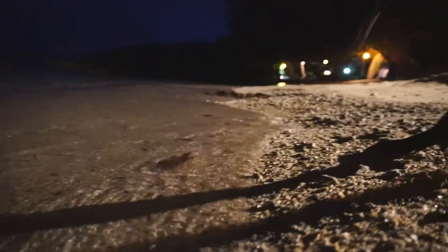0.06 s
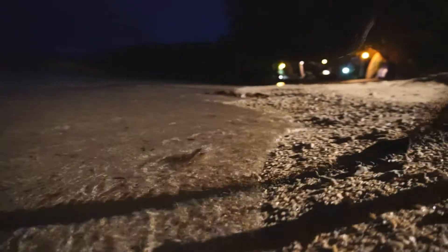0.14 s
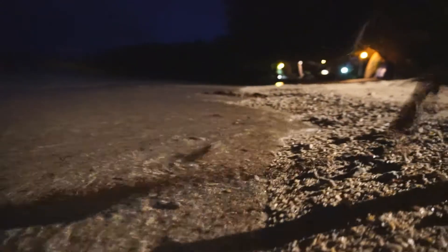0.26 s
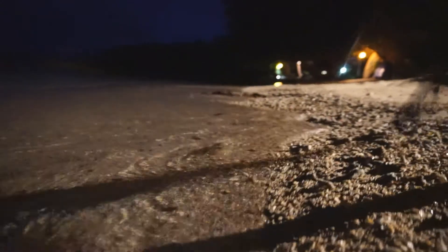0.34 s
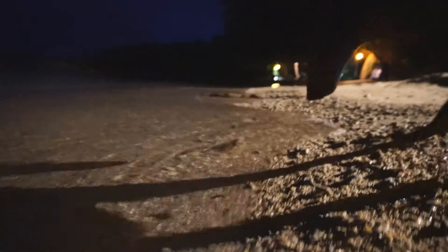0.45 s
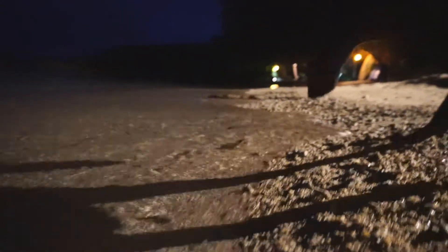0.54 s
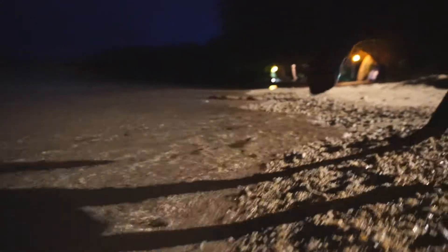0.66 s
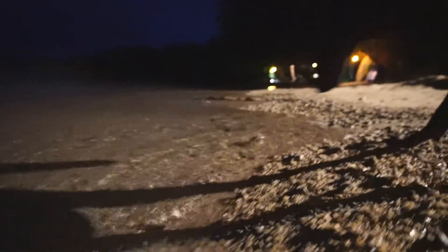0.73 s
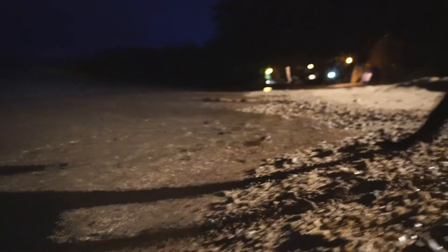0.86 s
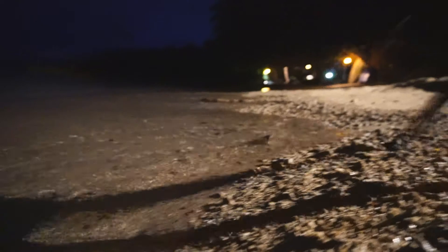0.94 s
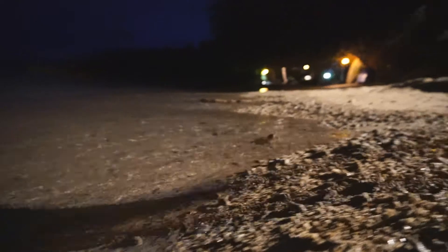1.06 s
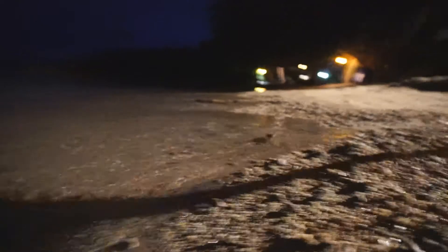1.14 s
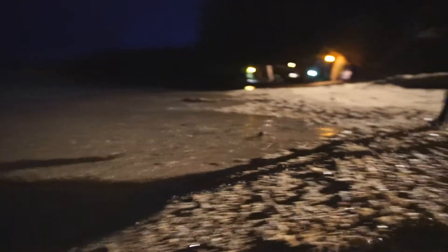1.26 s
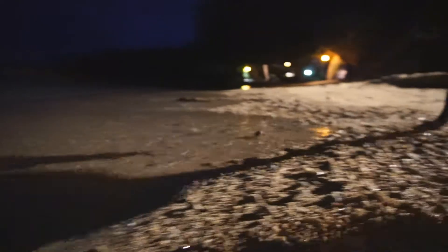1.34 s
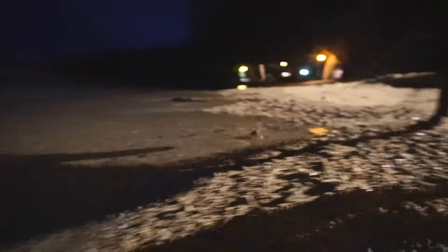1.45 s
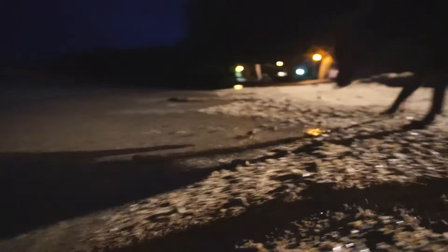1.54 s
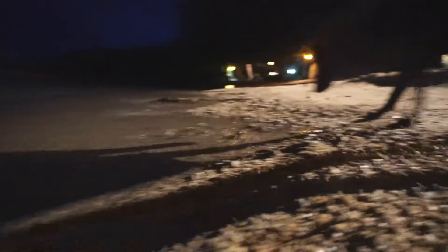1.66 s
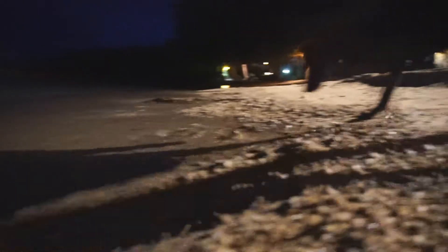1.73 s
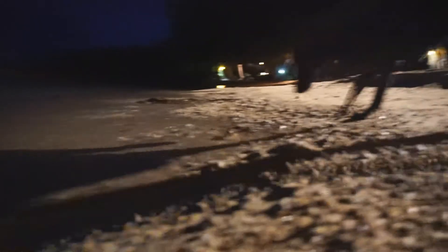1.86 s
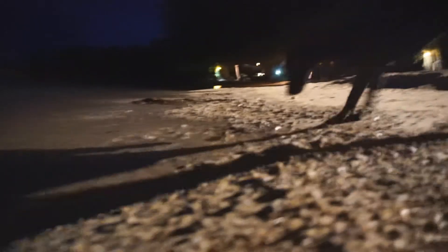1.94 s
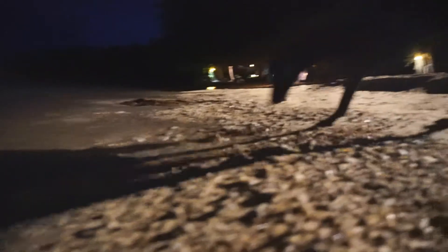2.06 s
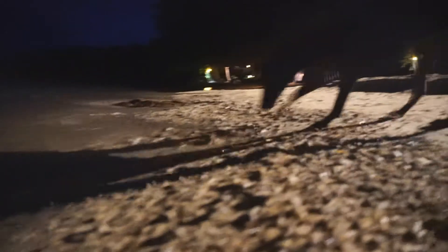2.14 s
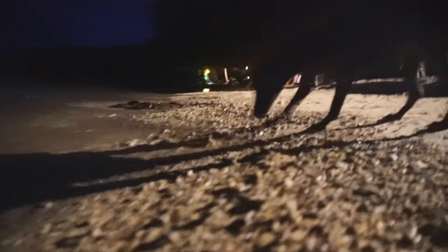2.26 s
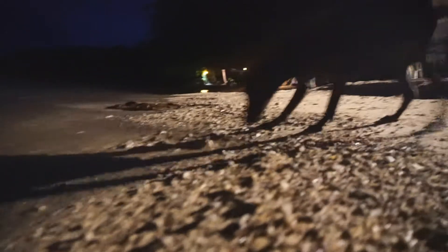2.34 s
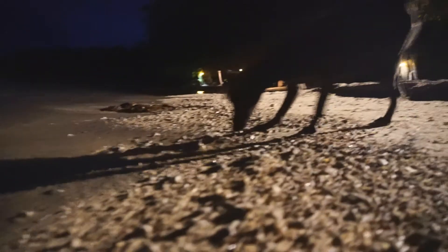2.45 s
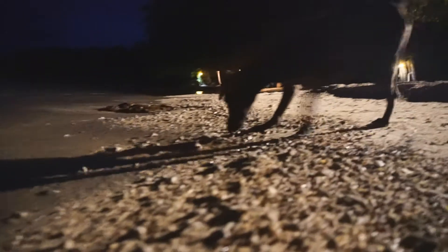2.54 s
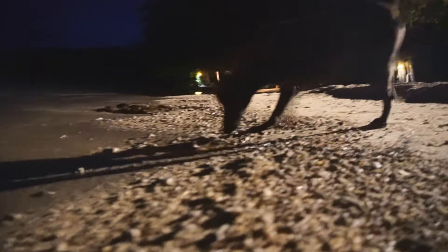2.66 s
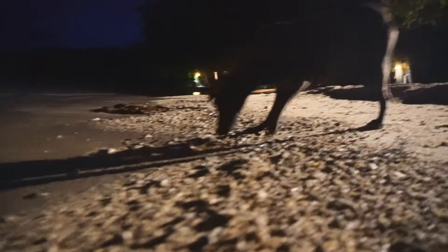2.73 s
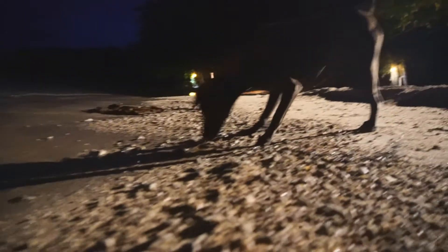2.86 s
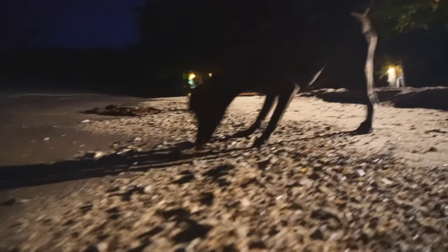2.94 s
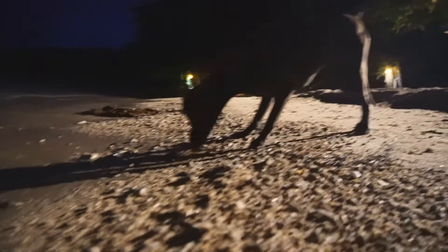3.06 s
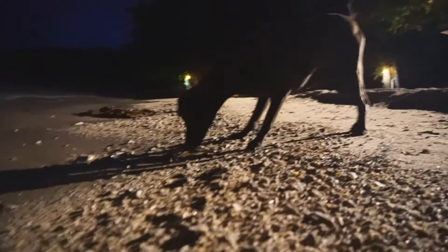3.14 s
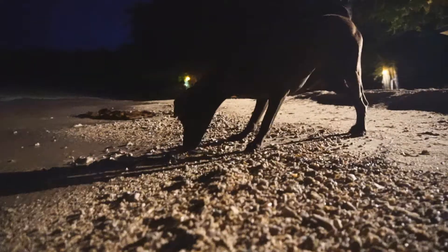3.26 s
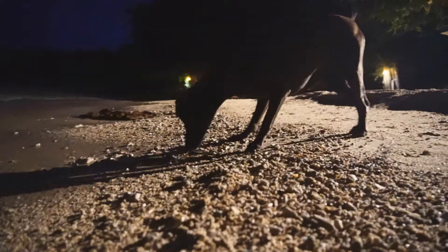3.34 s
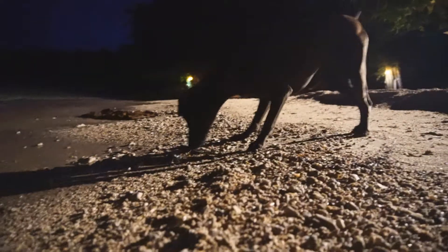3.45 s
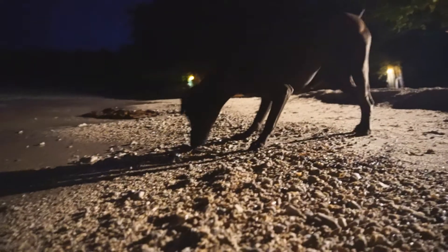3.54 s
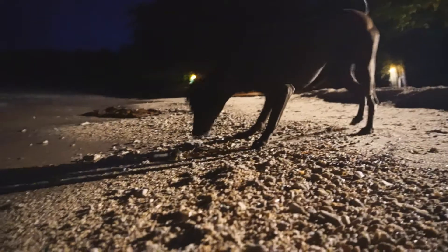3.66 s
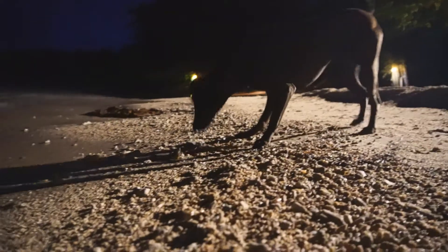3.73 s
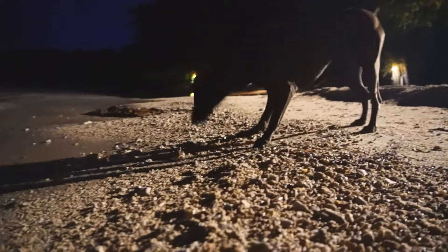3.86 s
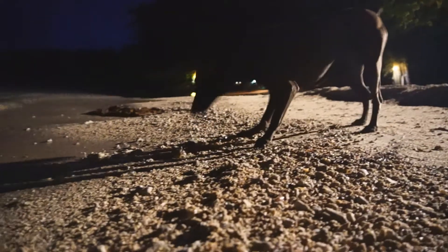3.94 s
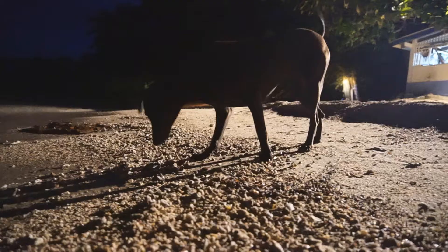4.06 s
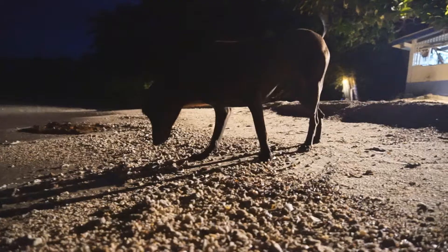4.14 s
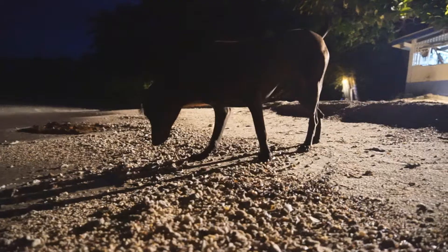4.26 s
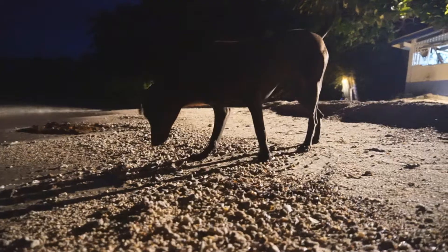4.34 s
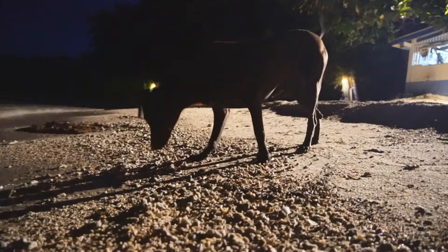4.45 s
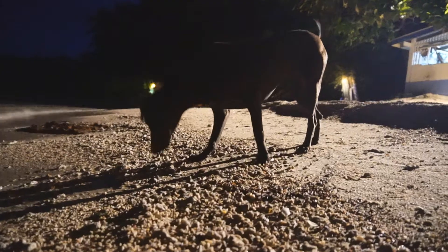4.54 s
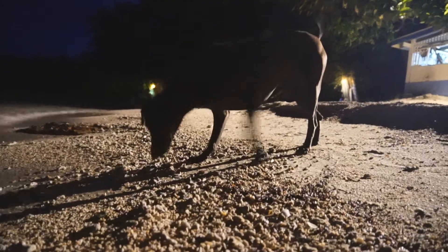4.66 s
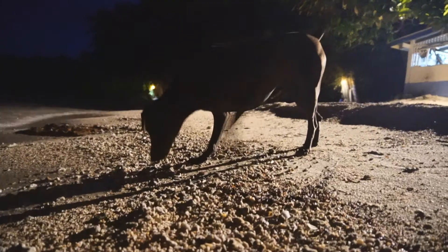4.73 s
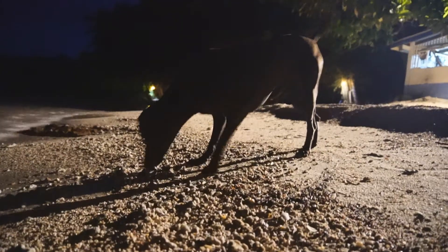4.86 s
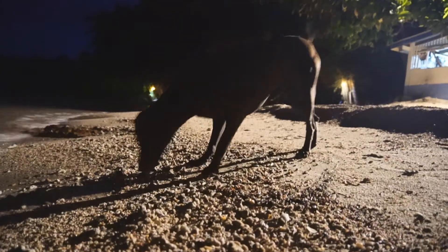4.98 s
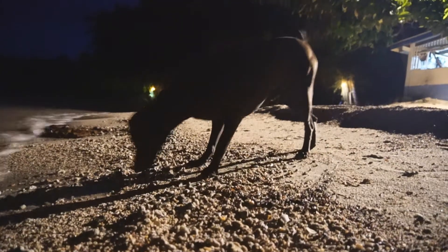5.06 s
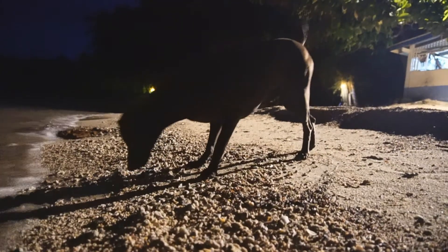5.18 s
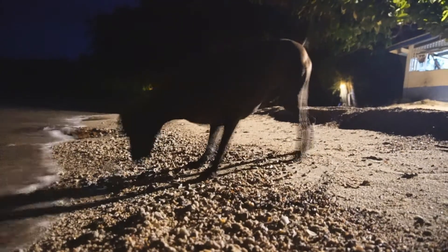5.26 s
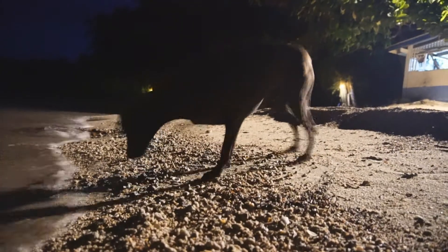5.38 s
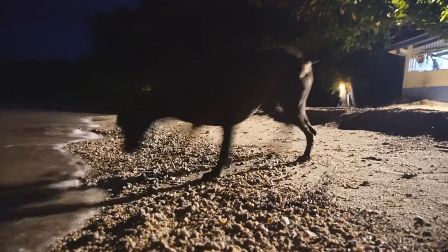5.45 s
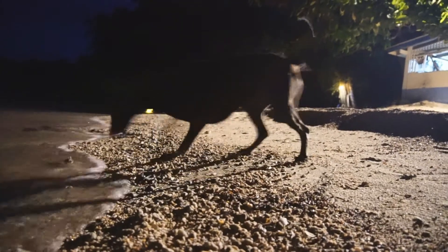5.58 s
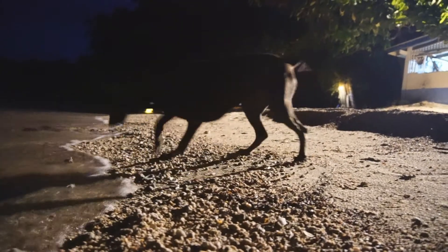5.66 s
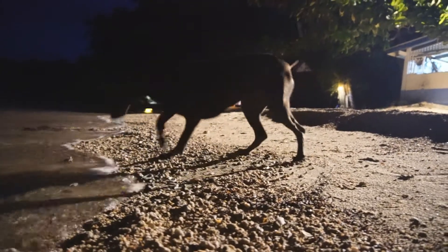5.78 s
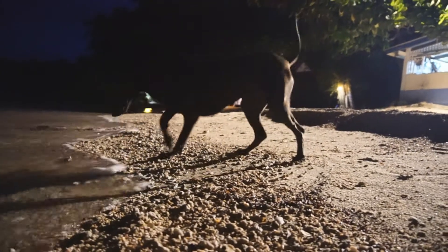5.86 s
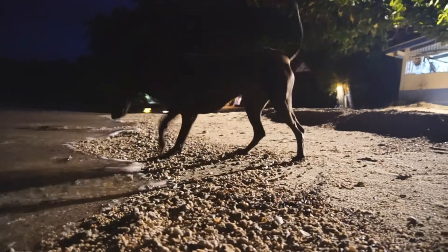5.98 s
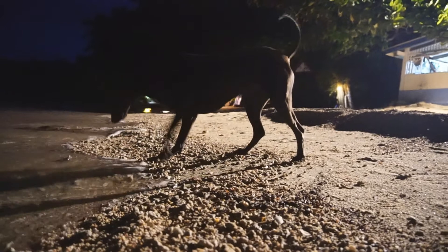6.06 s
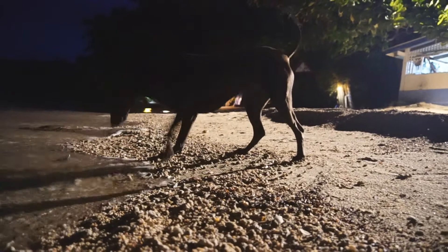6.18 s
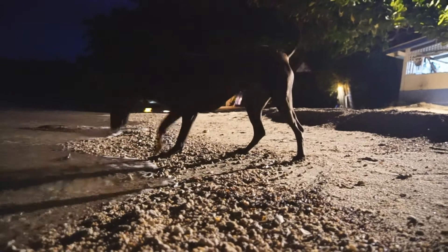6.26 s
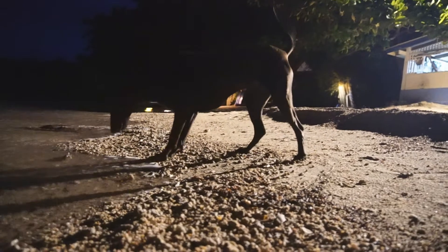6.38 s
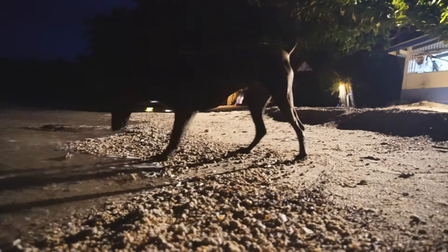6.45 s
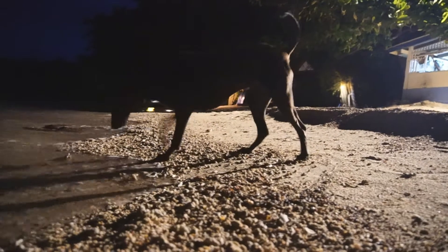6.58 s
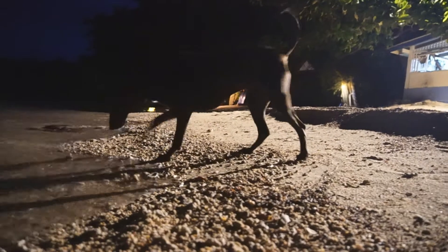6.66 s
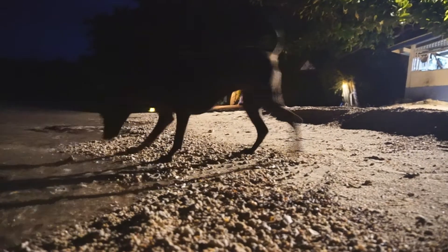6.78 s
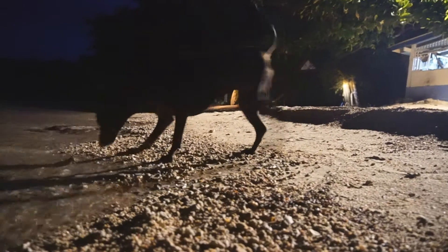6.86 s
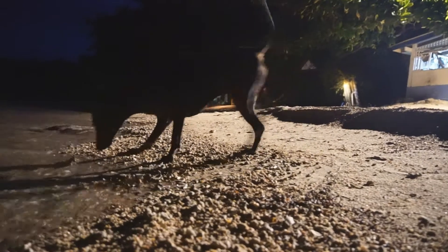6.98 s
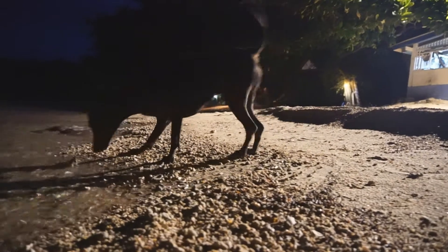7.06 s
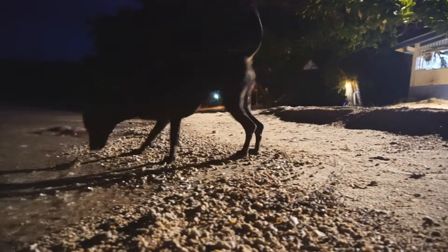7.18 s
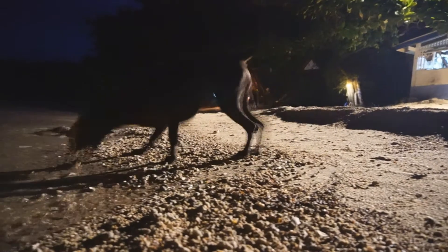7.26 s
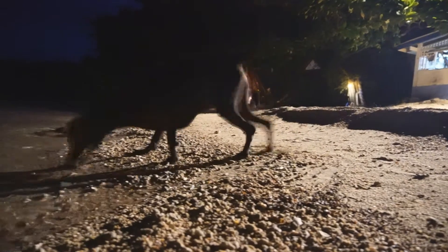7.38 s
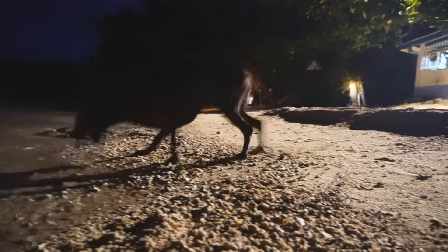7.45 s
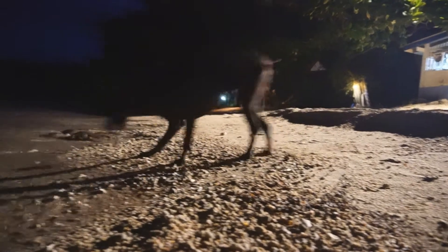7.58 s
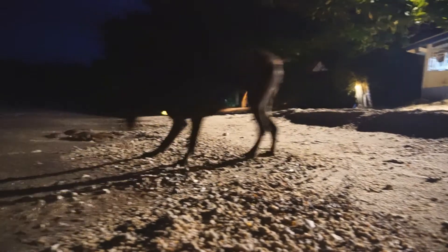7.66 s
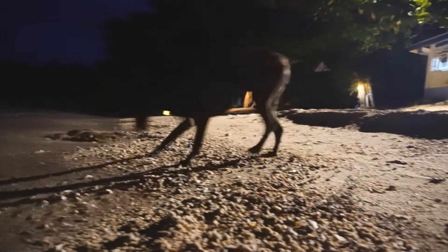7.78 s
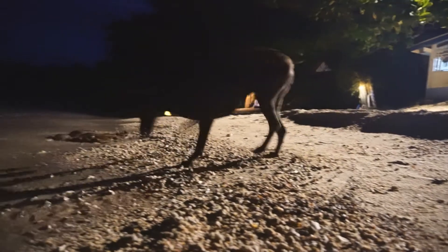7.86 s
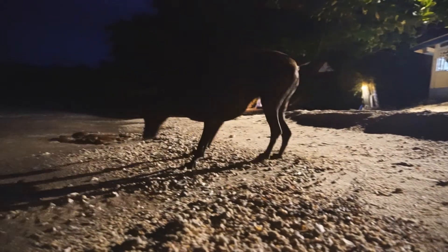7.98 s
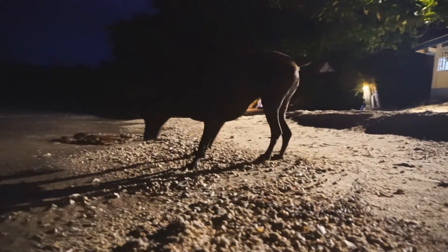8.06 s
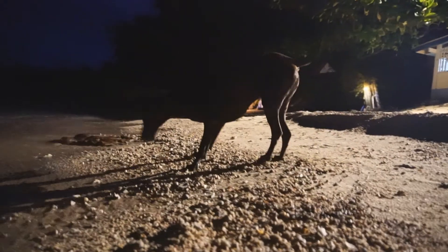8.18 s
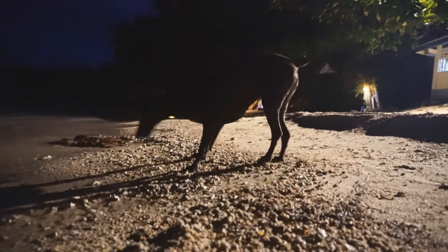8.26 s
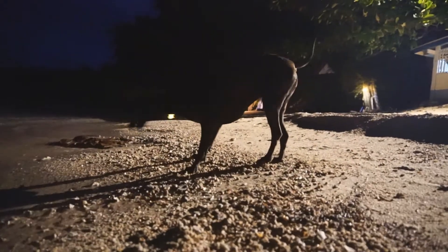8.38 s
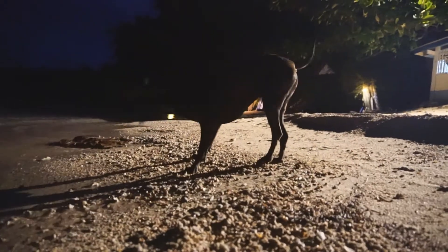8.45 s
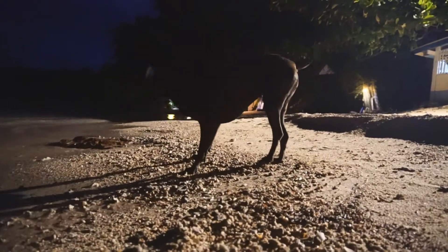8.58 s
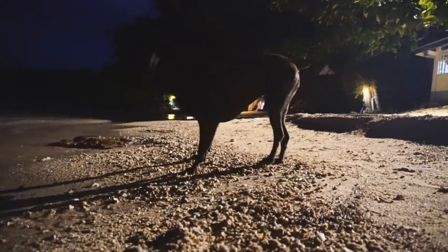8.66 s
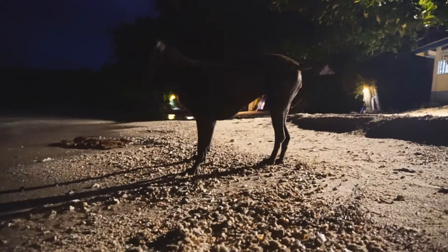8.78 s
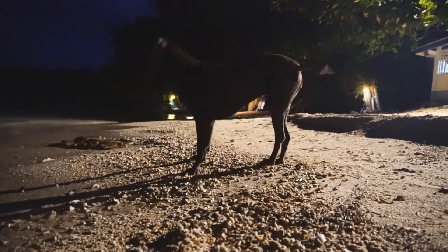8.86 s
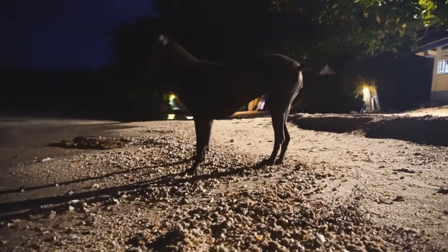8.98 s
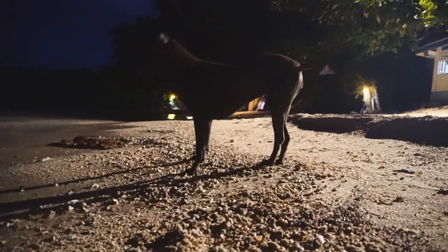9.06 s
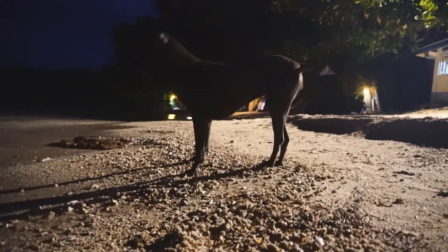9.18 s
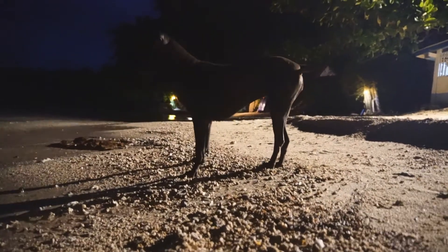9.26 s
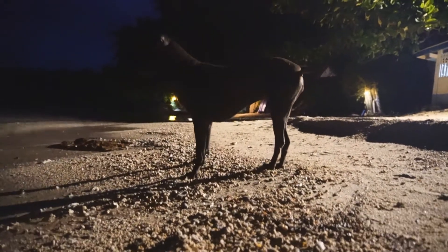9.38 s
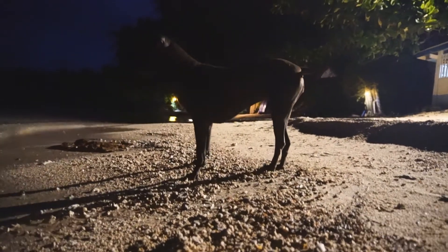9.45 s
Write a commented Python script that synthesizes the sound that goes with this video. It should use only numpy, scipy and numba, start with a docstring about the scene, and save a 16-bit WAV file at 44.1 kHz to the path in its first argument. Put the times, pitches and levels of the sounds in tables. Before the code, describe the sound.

Little waves bubble and drain through gravel with plops and stony clicks while a cricket trills and a dog stamps the pebbles

```python
"""Night on a gravel shore, a small stereo microphone held low. From the start a cricket (gliding tones) chirps
on the right over a far chorus and far surf (noise), while a wavelet gurgles a little to the left (ringing
bubbles) and bright foam and grit fizz and crunch mostly on the right (short grains and hiss), among plops,
ticks and dry snaps. After 3.8 s a second wavelet runs up and drains until about 6.5 s. Near 7.65 s and again
at 8.24 s a dog's paw stamps the gravel (ringing pebbles), with crunching grit; the cricket keeps on."""
import sys
import numpy as np
from scipy import signal
from scipy.fft import rfft, irfft, next_fast_len
from scipy.io import wavfile
from scipy.ndimage import uniform_filter1d
from numba import njit

SR = 44100
rng = np.random.default_rng(int(sys.argv[2]) if len(sys.argv) > 2 else 0)


def dump(signal):
    """Clip the signal to [-1, 1] and save it as 16-bit WAV at the path in sys.argv[1]."""
    limited = np.clip(np.atleast_2d(signal).T, -1, 1)
    pcm = np.round(limited * 32767).astype(np.int16)
    wavfile.write(sys.argv[1], SR, pcm)


N = 419391

# In every table a pan is left minus right [dB]. Ring levels are those before the swell and fade.

# Far surf and air: (frequency [Hz], relative density [dB per Hz])
NIGHT_SPECTRUM = [(100, -19), (300, -1), (700, 5), (1500, 6.5), (2500, -7), (4200, 0.5), (6000, 1.5),
                  (9000, 1.5), (12000, 0), (16000, -5)]
# Cricket chirps: (time [s], level at the right [dB])
CHIRPS = [(-0.075, -40.5), (0.142, -38.5), (0.365, -42), (0.582, -39), (0.798, -40), (1.017, -40),
          (1.229, -40.5), (1.451, -41.5), (1.668, -40.5), (1.878, -40), (2.091, -38.5), (2.308, -38.5),
          (2.522, -38), (2.731, -40.5), (2.976, -37.5), (3.191, -38.5), (3.398, -39), (3.611, -38),
          (3.834, -38), (4.042, -40), (4.25, -39.5), (4.45, -38), (4.669, -40), (4.883, -39.5),
          (5.097, -37), (5.315, -37.5), (5.543, -38.5), (5.776, -40.5), (5.998, -39.5), (6.218, -39),
          (6.43, -38.5), (6.64, -38.5), (6.855, -39), (7.072, -38.5), (7.286, -38), (7.497, -38.5),
          (7.708, -38.5), (7.94, -37), (8.149, -38), (8.361, -37.5), (8.578, -37.5), (8.792, -37.5),
          (9.019, -37), (9.234, -38), (9.459, -40)]
# Wing strokes of one chirp: (start [s], length [s], start pitch [Hz], end pitch [Hz], level [dB],
# lateness of the peak [0-1; 1 is midway])
WING_STROKES = [(0.0019, 0.026, 2225, 2290, -5.5, 0.6), (0.02, 0.041, 2290, 2400, -11.5, 0.9),
                (0.0115, 0.039, 2515, 2470, 2.5, 0.67), (.046, 0.03, 2495, 2470, 3, 0.6),
                (.078, 0.028, 2465, 2440, -0.5, 1), (.125, 0.047, 2479, 2436, -15, 0.6)]
# Gurgle of the water: (time [s], level [dB], small bubbles over that [dB], large bubbles over that [dB], pan [dB])
WASH_CURVES = [(0, -74.5, 8, 1, 1), (.2, -52, -1, -6.5, 3), (.45, -62.5, 0, -10.5, 1),
               (.7, -63, 8, -7.5, 3), (1.1, -70, -7, -9, 2), (1.5, -73.5, 4, -9, 0), (2.1, -76, 0, -12, 4),
               (2.3, -65, -3, -13, 2.5), (2.5, -80, 2, -7, 4), (3.6, -80, 9.5, 0, 5),
               (3.8, -58.5, -2, -27, 7), (4.25, -56, 2, -21, 4.5), (4.35, -45.5, 4.5, -16, 4),
               (4.52, -49, 5, -8.5, 3.5), (4.65, -43.5, 6, -12, 3.5), (4.73, -47.5, 5, -9.5, 4),
               (4.82, -42.5, 3.5, -8.5, 3), (5.1, -49.5, 3.5, -8.5, 1.5), (5.65, -54.5, 5.5, -10, 1),
               (6, -66.5, 3.5, -7.5, 2), (7.55, -74.5, 7, -9, 2), (7.66, -65, 3, 2, -1),
               (7.85, -73.5, 8.5, -6, -2), (8.55, -68, 6, -6.5, 2), (9.05, -73.5, 5, -7, 2.5),
               (9.22, -64.5, 6, -16, 2.5), (9.51, -58, -3.5, -22, 5.5)]
# Rush of water under the bubbles: (frequency [Hz], relative density [dB per Hz])
RUSH_SPECTRUM = [(59, -80), (100, -52), (138, -55), (252, -39.5), (837, -5.5), (1010, -7), (2550, -1.5),
                 (2780, -13), (6000, -16), (7800, -40), (13200, -120)]
# Single bubbles and drips: (time [s], level [dB], pitch [Hz], pan [dB])
PLOPS = [(0.162, -21.5, 1950, 2.0), (0.251, -21.5, 1680, -1.5), (0.315, -27, 2000, -1.0),
         (0.419, -42, 1900, -1.5), (0.707, -34, 1170, 3.0), (0.762, -41, 1490, 0.0),
         (1.418, -33.5, 1480, 0.5), (1.494, -44, 720, 5), (1.618, -41, 1130, -3.5), (1.655, -49.5, 660, -1),
         (2.174, -43.5, 1170, 1.5), (2.218, -38, 1690, 0.0), (2.342, -44, 1130, 5), (3.145, -40, 1750, 1.0),
         (3.263, -51, 660, 1.0), (3.61, -46, 1250, 17), (3.77, -43.5, 1300, 12), (3.852, -39, 1160, 11),
         (3.881, -35, 1150, 14), (4.235, -29.5, 1380, 17), (4.323, -27, 1180, 11), (4.365, -22, 1770, 3),
         (4.419, -25, 1210, 8), (4.463, -41, 835, 3), (4.483, -23.5, 1290, 11), (4.606, -32, 1870, 5.0),
         (4.638, -24, 930, 5.0), (4.708, -25, 1030, 5.5), (4.808, -19, 1570, 6), (4.861, -36, 720, 4.5),
         (5.105, -25.5, 810, 3), (5.198, -29, 1430, 1.5), (5.478, -28, 1780, 3.0), (5.54, -33, 1070, 3.0),
         (5.685, -26.5, 1380, 2.0), (5.73, -24, 1880, 2.0), (5.901, -40, 1860, 0.5),
         (7.647, -28.5, 1380, 1.5), (7.84, -36, 1830, 0.0), (7.949, -35, 2060, 2.0), (8.0, -40, 1840, 1.5),
         (8.179, -46, 607, 0.5), (8.285, -46, 1800, 1.5), (8.531, -39.5, 1540, 5.0), (8.633, -44, 2060, 21),
         (9.089, -37, 1830, 6.5), (9.158, -42, 880, 6), (9.279, -41, 1400, 8), (9.465, -37, 734, 8)]
# Pockets of air that shrink and glide up: (time [s], level [dB], start pitch [Hz], pan [dB],
# fade by 60 dB [cycles], pitch rise [share])
GURGLES = [(.24, -25, 435, 0, 20, 0.23), (2.185, -38.5, 1200, 2, 170, 1.4), (2.232, -31, 503, 1, 12, 0.37),
           (2.29, -43, 392, 5, 48, 1.9), (3.862, -34, 853, 21, 63, 1.55), (4.04, -24, 538, 5, 57, 2.2),
           (7.615, -29, 293, -2, 6.3, 0.17), (7.952, -29.5, 800, 1, 29, 0.28),
           (8.98, -42, 298, 1, 10, 0.26), (9.185, -36, 528, 3, 50, 0.51), (9.305, -39, 453, 4, 28, 0.35)]
# Foam: (time [s], level [dB], brightness from coarse to finest grains [dB], pan [dB])
FOAM_CURVES = [(0, -49.5, -10, -1.5), (.45, -47.5, -9.5, -4), (1.16, -57.5, -5.5, -6), (1.35, -61, 1.5, -7),
               (1.9, -68.5, -2.5, -7.5), (2.67, -62.5, -1.5, 0), (3.55, -67, -2.5, 2.5),
               (4.19, -62.5, -0.5, 3), (4.26, -51.5, -0.5, 3), (4.36, -46, -5.5, 3), (4.65, -46.5, -6, 2),
               (5.1, -47, -11.5, 4.5), (5.4, -44.5, -16, 2), (5.8, -45, -7.5, 1.5), (6.15, -55.5, -12, 2.5),
               (6.6, -58, -7.5, 3.5), (7.05, -55, -9, 3.5), (7.5, -61, -3, 3.5), (7.85, -56.5, -4.5, 0),
               (8.6, -62, -3, 3.5), (9.51, -60, -6.5, 3)]
# Crunching grit, under paws or tumbled by the wave: (time [s], hold [s], level [dB],
# brightness from coarse to finest grains [dB], pan [dB])
CRUNCHES = [(0.163, 0.025, -45.5, -21, 3), (0.214, 0.06, -50.5, 4, -7), (0.464, 0.014, -50.5, 4, -9.5),
            (0.602, 0.049, -53, 5, -8), (0.693, .05, -51.5, -0.5, -8), (1.206, 0.047, -53, -0.5, -13.5),
            (1.282, 0.018, -57, 7, -9), (1.625, 0.025, -60, 4, -8), (2.087, 0.12, -62.5, -2, -2),
            (2.236, 0.063, -60, -4, -4), (2.57, .03, -67, 0, -8), (2.774, 0.025, -63, 5, -11),
            (3.12, 0.15, -63, 0, -1), (4.76, 0.11, -44.5, -8, 5.5), (5.2, .02, -46, -7, -1),
            (5.62, 0.068, -43.5, -6, -3), (6.65, 0.034, -61, 0, 3), (7.082, .04, -54, -10, 3),
            (7.35, 0.026, -71, -2, -4), (7.639, 0.15, -41, -5, 0.5), (8.07, 0.035, -60, 0, 7),
            (8.266, 0.084, -58, 0, 3), (8.24, 0.0083, -43, -5, 0), (8.454, 0.049, -58, -13, 0),
            (9.072, 0.046, -56.5, -6, 4)]
# Stones that click: (time [s], level [dB], pitch [Hz], pan [dB])
CLICKS = [(0.0893, -33.5, 6190, -4.5), (0.1067, -32, 7620, -2.5), (0.166, -33, 3060, -0.5),
          (0.192, -26.5, 4270, -2), (0.2708, -37, 15000, -4), (0.4244, -34, 3040, -3.5),
          (0.467, -23.5, 14200, -9), (0.4844, -21.5, 14400, -7.5), (0.6434, -29, 14000, -6.5),
          (0.7013, -28.5, 14200, -9), (0.7634, -34, 13100, -6.5), (1.0949, -32.5, 14700, -14),
          (1.1987, -34, 14600, -8.5), (1.209, -28, 14800, -7.5), (1.238, -22.5, 14100, -7.5),
          (1.2944, -29, 13800, -8.0), (1.408, -32, 14400, -9), (1.6277, -37, 13800, -11),
          (2.2927, -38, 12800, -7), (2.5785, -32.5, 14400, -6.0), (2.7835, -32, 12500, -8.0),
          (3.1554, -36, 9640, -3), (3.6262, -43, 14300, 0.0), (4.2313, -29.5, 10700, 1),
          (4.7366, -25, 7260, 3.0), (4.7636, -37, 3260, 4.0), (5.203, -26, 2980, 1.0),
          (5.3073, -27.5, 4700, 9), (5.368, -31, 7000, -1), (5.8007, -16, 10500, 1),
          (5.912, -27, 4750, 2.5), (5.937, -37, 4520, 4), (6.193, -38, 5900, 3.5), (6.5161, -38, 7750, 3.5),
          (6.6558, -36, 4320, 3.5), (6.7542, -31.5, 5900, 3.0), (6.999, -34, 8130, 4.0),
          (7.087, -30, 6650, 8), (7.3272, -39, 6590, 2.5), (7.347, -34, 9130, 0.0),
          (7.3603, -30, 8630, -1.0), (7.3854, -33, 10500, -1.5), (7.6197, -28, 9540, 2),
          (7.6488, -25, 7550, 2), (7.6599, -20, 4440, 13), (8.0564, -35, 7770, 7), (8.1934, -39, 3070, 0),
          (8.2407, -25, 12200, -1), (8.2471, -17.5, 12300, 2), (8.7374, -43, 3210, 1.5),
          (8.9042, -37, 3100, 6), (9.0872, -38.5, 4950, 9)]
# Dry snaps, some on top of a click or plop: (time [s], level [dB], pitch [Hz], pan [dB])
SNAPS = [(0.2513, -21, 3100, -4.5), (0.6135, -20, 10900, -7.5), (0.6689, -30, 3490, -4),
         (1.2121, -29, 11000, -8.0), (1.312, -24, 11600, -8.0), (1.6604, -36, 8290, -10.0),
         (2.2484, -36, 3340, -3.5), (2.5944, -34, 7540, -10.5), (2.9667, -23, 9140, -8.5),
         (4.8274, -24, 4320, 2.5), (7.3604, -24, 8640, -6.0), (7.4114, -22.5, 5800, -2.5),
         (7.8214, -28, 8380, -0.5)]
# Paw coming down hard: (time [s], level [dB], pan [dB])
STAMPS = [(7.647, -50, 1), (7.66, -24.5, 0), (7.667, -34, 1.0), (7.684, -30.5, 3), (8.242, -34, -1)]
# Short modes of the stamped pebbles: (frequency [Hz], level [dB], fade by 60 dB [s])
PEBBLE_MODES = [(334, -16.5, 0.012), (1176, -10, 0.036), (1390, -15, 0.047), (2130, -7, 0.0098),
                (2894, 3, 0.033), (3580, -12, 0.0088), (4330, -4, 0.015), (5640, -11, 0.0093)]
# Rumble added at the microphone: (frequency [Hz], relative density [dB per Hz])
RUMBLE_SPECTRUM = [(20, -28), (40, -2), (75, -5), (120, 5.5), (200, -8), (400, -43)]

NIGHT_DB = -64  # before its slow swings
CRICKET_PAN_DB = -15  # left minus right
SLOWING_PER_S = .008  # the strokes spread out a little as the song goes on
TREES_T60_S, TREES_DB = 0.34, -8  # echo fade by 60 dB, level on the right
CHORUS_HZ, CHORUS_WIDTH_HZ, CHORUS_DB = 2470, 79, (-60.5, -52.5)  # far crickets, levels left and right
SURGE_DB, SURGES_PER_S = 1.5, 20  # the gurgle comes in lumps
PLOP_CYCLES = 25.4  # fade by 60 dB
LEFT_LEAD = 4  # samples by which the left channel hears the water first
FINE_SHARE, FINE_DB = 0.45, -0.5  # middle grain size: share of the brightness it takes, its level
SPIKE_DB = -6.5  # sharp ticks within the fizz
CRUNCH_ATTACK_S, CRUNCH_RELEASE_S = 0.0074, 0.04
TRICKLE_DB = -74  # stray drips and ticks between the stones
CLICK_S, CRACKLE_DB = 0.0024, -14  # time constant of the crackle, its level under the tick
TICK_CYCLES, SNAP_CYCLES = 13, 5  # fade by 60 dB
RUMBLE_DB, HUM_HZ, HUM_DB = -94, 77, -94  # levels before their shared swings
TOP_HZ = 15850  # the microphone's upper limit


def undb(db):
    """Amplitude of a level in dB."""
    return 10 ** (np.asarray(db) / 20)


def level(x, db):
    """Scale to an rms level."""
    return x * undb(db) / np.sqrt(np.mean(x ** 2))


def ears(pan_db):
    """Left and right gains."""
    return undb(np.array([pan_db, -pan_db]) / 2)


def curves(table):
    """Columns of a curve table at every sample."""
    s, *columns = np.transpose(table)
    t = np.arange(N) / SR
    return [np.interp(t, s, column) for column in columns]


def coloured(spectrum, alike):
    """Two noises of one colour that share part of their chance."""
    hz, db = np.transpose(spectrum)
    size = next_fast_len(N)
    bin_hz = np.arange(size // 2 + 1) * SR / size
    gain = undb(np.interp(np.log(bin_hz + 1), np.log(hz), db))
    mid, side = (irfft(rfft(rng.standard_normal(size)) * gain, size)[:N] for _ in range(2))
    alike = np.clip(alike, 0, 1)
    mid, side = mid * np.sqrt(1 + alike), side * np.sqrt(1 - alike)
    return level(np.array([mid + side, mid - side]), 0)


def band(x, lo_hz, hi_hz):
    """Band-pass, its upper edge kept under half the sample rate."""
    edges = [lo_hz, min(hi_hz, SR / 2.1)]
    return signal.sosfilt(signal.butter(2, edges, "bandpass", fs=SR, output="sos"), x)


def walk(rate):
    """Random levels, rate of them a second, joined by ramps; spread near 1."""
    hold = int(SR / rate)
    steps = np.repeat(rng.standard_normal(N // hold + 1), hold)
    return uniform_filter1d(steps, hold)[:N]


@njit
def ring(start, hz, cycles, rise, onset, gains, n, sr):
    """Sines that swell over an onset share, fade by 60 dB in so many cycles and rise in pitch."""
    out = np.zeros((2, n))
    for e in range(len(hz)):
        length = int(cycles[e] * sr / hz[e]) + 1
        w = 2 * np.pi * hz[e] / sr
        # the phasor turns and shrinks by one step a sample; the glide speeds up the turning
        phasor, step = 1 + 0j, np.exp(-np.log(1000) / length + 1j * w)
        glide = np.exp(1j * w * rise[e] / length)
        for i in range(length):
            u = min(i / (onset * length), 1.)
            value = u * u * (3 - 2 * u) * phasor.imag
            for c in range(2):
                if 0 <= start[c, e] + i < n:
                    out[c, start[c, e] + i] += gains[c, e] * value
            phasor *= step
            step *= glide
    return out


def grains(count, lo_hz, hi_hz, cycles, rise, onset, scatter_db, pan_db, lag):
    """A shower of small rings: even in log pitch, uneven in strength, spread over the shore."""
    t, pitch, size, side = rng.random((count, 4)).T
    # lag [samples]: largest time offset between the channels
    start = (t * N + np.outer([1, -1], lag * (side - .5))).astype(np.int64)
    scatter = scatter_db * np.clip(rng.standard_normal(count), -3, 2.5)
    gains = undb(scatter) * ears(pan_db * (2 * side - 1))
    hz = lo_hz * (hi_hz / lo_hz) ** pitch
    lengths = cycles * (0.27 + 1.69 * size)
    return level(ring(start, hz, lengths, rise * size, np.clip(onset, .01, .5), gains, N, 1. * SR), 0)


def typed(s, db, hz, pan_db, cycles, rise, onset):
    """One ring for each listed event."""
    start = np.tile((s * SR).astype(np.int64), (2, 1))
    gains = undb(db) * ears(pan_db)
    return ring(start, hz, cycles + 0 * s, rise + 0 * s, np.clip(onset, .01, .5), gains, N, 1. * SR)


def night():
    """Far surf and air: broad noise, nearly separate in the two channels, that swings slowly in level."""
    return coloured(NIGHT_SPECTRUM, alike=0.11) * undb(NIGHT_DB + 2.0 * walk(8.3))


def cricket():
    """Gliding wing strokes, never quite alike, thrown back by the trees over a far chorus."""
    call = np.zeros(N + 2 * SR)  # starts one second early
    for s, db in CHIRPS:
        chances = rng.standard_normal((len(WING_STROKES), 3))
        for (t, length, hz0, hz1, stroke_db, late), (a, b, c) in zip(WING_STROKES, chances):
            u = np.linspace(0, 1, int(length * SR))
            hz = hz0 + (hz1 - hz0) * u + 5.1 * a
            tone = np.sin(2 * np.pi * np.cumsum(hz) / SR + 9 * c)
            swell = np.sin(np.pi * u ** late) ** 0.72
            i = SR + int((s + t * (1 + SLOWING_PER_S * s) + .0015 * c) * SR)
            call[i:i + len(u)] += tone * swell * undb(db + stroke_db + b)
    # the echo is a fading noise tail that builds up over 0.1 s
    t = np.arange(SR) / SR
    tail = rng.standard_normal((2, SR)) * undb(-60 * t / TREES_T60_S) * np.minimum(t / 0.1, 1)
    tail /= np.sqrt(np.sum(tail ** 2, axis=1, keepdims=True))
    echo = signal.fftconvolve(call[None], tail, axes=1)[:, SR:SR + N]
    echo = echo * undb([[TREES_DB - 3.0], [TREES_DB]])
    half_width = CHORUS_WIDTH_HZ / 2
    far = band(rng.standard_normal((2, N)), CHORUS_HZ - half_width, CHORUS_HZ + half_width)
    direct = np.outer([undb(CRICKET_PAN_DB), 1], call[SR:SR + N])
    return direct + echo + level(far, 0) * undb(CHORUS_DB)[:, None]


def wash():
    """Bubbles of three sizes ring in surges over a rush, the mix moving as the wave tumbles and drains."""
    db, small_db, large_db, pan_db = curves(WASH_CURVES)
    small = grains(count=7000, lo_hz=967.0, hi_hz=3260.0, cycles=26.6, rise=1.0, onset=0.1,
                   scatter_db=5.5, pan_db=6.0, lag=5.4)
    middle = grains(count=3500, lo_hz=481.2, hi_hz=947.0, cycles=15.6, rise=1.0, onset=0.14,
                    scatter_db=3.5, pan_db=6.5, lag=4.7)
    large = grains(count=3000, lo_hz=254.4, hi_hz=475.0, cycles=8.4, rise=0.9, onset=0.16,
                   scatter_db=2.5, pan_db=2.0, lag=1.7)
    bubbles = middle + undb(small_db) * small + undb(large_db) * large
    rush = undb(small_db / 2 + 3.5) * coloured(RUSH_SPECTRUM, alike=1.0)
    surge = undb(db + SURGE_DB * walk(SURGES_PER_S))
    plops = typed(*np.transpose(PLOPS), PLOP_CYCLES, rise=0.3, onset=0.1)
    gurgles = typed(*np.transpose(GURGLES), onset=0.53)
    water = surge * ears(pan_db) * (bubbles + rush) + plops + gurgles
    return np.array([np.roll(water[0], -LEFT_LEAD), water[1]])


def crunch(s, hold):
    """Envelope of one crunch: attack, hold, release."""
    t = np.arange(N) / SR - s
    attack = np.clip(1 + t / CRUNCH_ATTACK_S, 0, 1)
    return attack * np.exp(-np.maximum(t - hold, 0) / CRUNCH_RELEASE_S)


def fizz():
    """Foam and crunching grit: flickering grains over hiss in three sizes, where their powers add."""
    foam_db, foam_bright_db, foam_pan_db = curves(FOAM_CURVES)
    parts = [(ears(foam_pan_db) * undb(foam_db), foam_bright_db)]
    for s, hold, db, bright_db, pan_db in CRUNCHES:
        parts.append((np.outer(ears(pan_db) * undb(db), crunch(s, hold)), bright_db))
    hiss = coloured([(20, 0), (20000, 0)], alike=0.5)
    # (low edge [Hz], high edge [Hz], share of the brightness, level [dB], grains over hiss [dB])
    sizes = ((2046.0, 7010.0, 0.023, 0.015, -3.2),
             (5910.0, 11330.0, FINE_SHARE, FINE_DB, -3.5),
             (10440.0, 14800.0, 0.95, 0, 1.3))
    out = 0
    for lo_hz, hi_hz, share, size_db, grain_db in sizes:
        shower = grains(count=9000, lo_hz=lo_hz, hi_hz=hi_hz, cycles=9.3, rise=0.055, onset=0.3,
                        scatter_db=2.0, pan_db=6.5, lag=6.)
        gain = np.sqrt(sum((g * undb(share * b + size_db)) ** 2 for g, b in parts))
        out = out + gain * (undb(grain_db) * shower + level(band(hiss, lo_hz, hi_hz), 0))
    finest_gain = gain  # the sharp ticks follow the last, finest size
    spikes = grains(count=400, lo_hz=4160.0, hi_hz=14300.0, cycles=2.75, rise=0, onset=.1,
                    scatter_db=1.0, pan_db=7.0, lag=5.)
    flicker = undb(1.7 * walk(40))
    return flicker * out + undb(SPIKE_DB) * finest_gain * band(spikes, 2500, 18000)


def trickle():
    """Sparse small drips and ticks all along the water's edge, ringing at scattered pitches."""
    drips = grains(count=500, lo_hz=633.0, hi_hz=9540.0, cycles=19.4, rise=0.42, onset=0.092,
                   scatter_db=8.5, pan_db=11.5, lag=2.0)
    return undb(TRICKLE_DB) * drips


def clicks():
    """A tick at the stone's pitch inside a short crackle around that pitch, which swells and fades."""
    s, db, hz, pan_db = np.transpose(CLICKS)
    noise = coloured([(20, 0), (20000, 0)], alike=.4) * undb(4.5 * walk(700))
    wide = level(band(noise, 1000, 23500), -9.5)
    out = np.zeros((2, N + SR))
    u = np.arange(int(9 * CLICK_S * SR)) / (CLICK_S * SR)
    swell = (np.e * u / 2) ** 2 * np.exp(-u)  # reaches 1 at two time constants
    starts = ((s - CLICK_S) * SR).astype(int)
    gains = (undb(db + CRACKLE_DB) * ears(pan_db)).T
    for start, gain, pitch in zip(starts, gains, hz):
        span = slice(start, start + len(u))
        crackle = level(band(noise[:, span], pitch / 2, pitch * 2), 0) + wide[:, span]
        out[:, span] += np.outer(gain, swell) * crackle
    return out[:, :N] + typed(s, db, hz, pan_db, TICK_CYCLES, rise=0, onset=0.039)


def snaps():
    """Dry snaps, some on top of a click or plop: a few cycles with next to no swell."""
    return band(typed(*np.transpose(SNAPS), SNAP_CYCLES, rise=0, onset=.01), 1500, 18000)


def paws():
    """Each stamp knocks the pebbles into their short modes, each time a little different."""
    s, db, pan_db = np.transpose(STAMPS)
    out = 0
    for hz, mode_db, t60 in PEBBLE_MODES:
        a, b = rng.standard_normal((len(s), 2)).T
        out = out + typed(s, db + mode_db + 3 * a, hz * (1 + .1 * b), pan_db, t60 * hz, rise=0, onset=0.057)
    return out


def scene():
    """All that reaches the microphone."""
    return night() + cricket() + wash() + fizz() + trickle() + clicks() + snaps() + paws()


def record(dry):
    """The bass is thinned, a faint rumble and a hum that come and go join, the top is cut."""
    thin = signal.sosfilt(signal.butter(3, 230, "highpass", fs=SR, output="sos"), dry)
    hum = np.sin(2 * np.pi * HUM_HZ * np.arange(N) / SR) * undb(HUM_DB)
    rumble = coloured(RUMBLE_SPECTRUM, alike=0.78) * undb(RUMBLE_DB)
    swings = undb(np.minimum(11.5 * walk(6), 5.0))
    top_cut = signal.ellip(10, .2, 70, TOP_HZ, fs=SR, output="sos")
    return signal.sosfilt(top_cut, thin + (rumble + hum) * swings)


dry = scene()
out = record(dry)
dump(out)
```